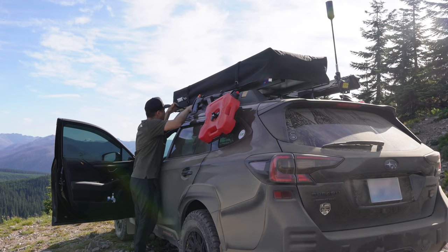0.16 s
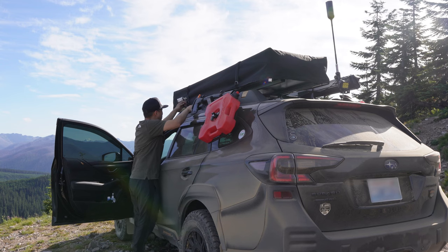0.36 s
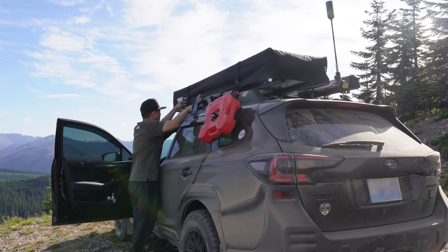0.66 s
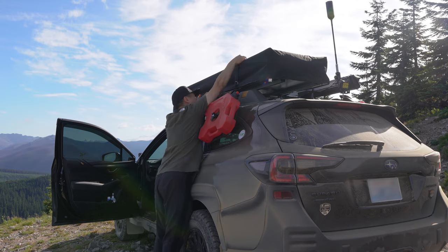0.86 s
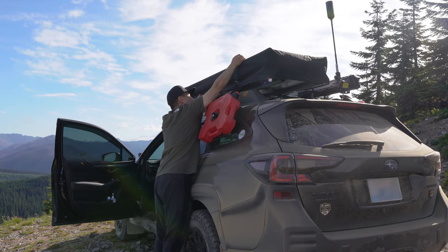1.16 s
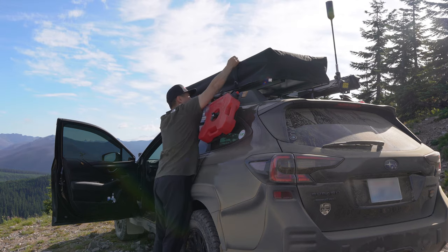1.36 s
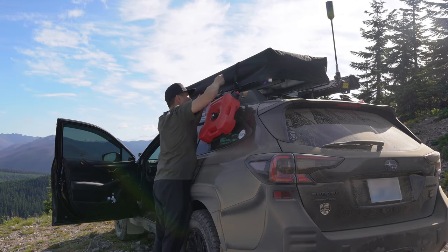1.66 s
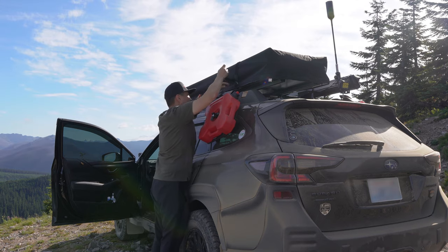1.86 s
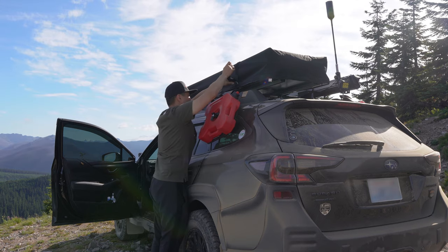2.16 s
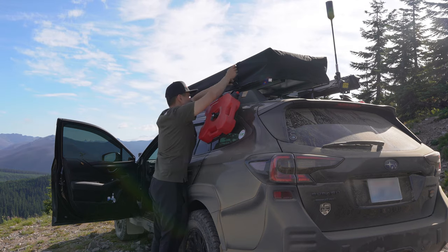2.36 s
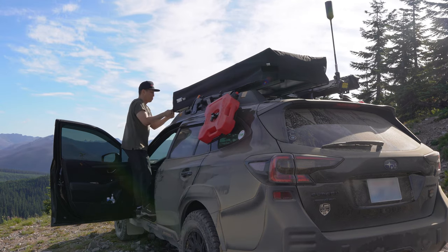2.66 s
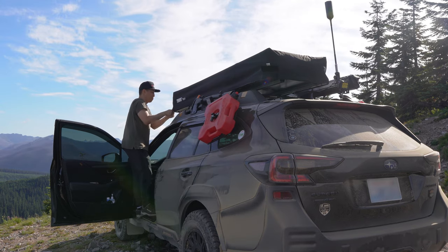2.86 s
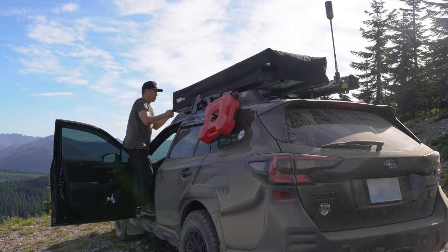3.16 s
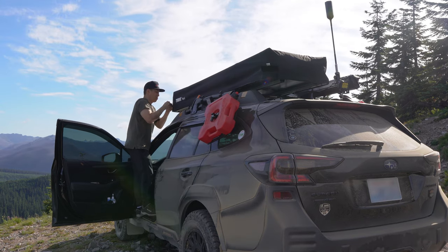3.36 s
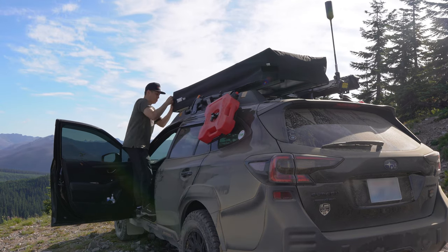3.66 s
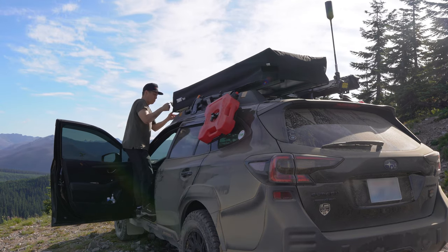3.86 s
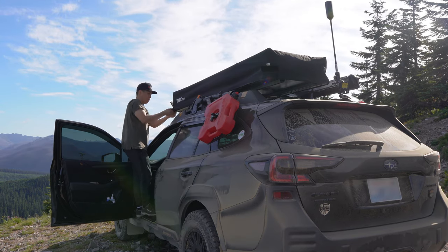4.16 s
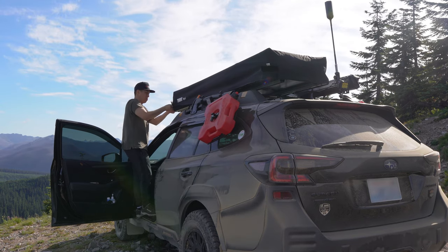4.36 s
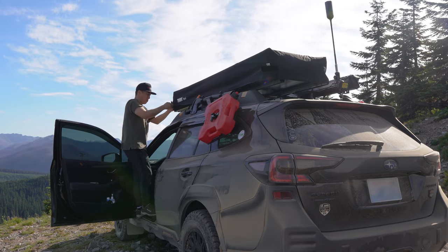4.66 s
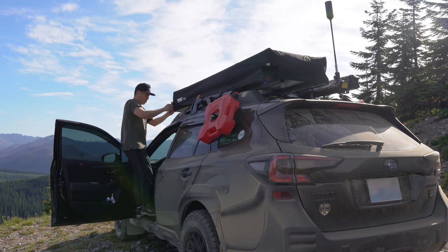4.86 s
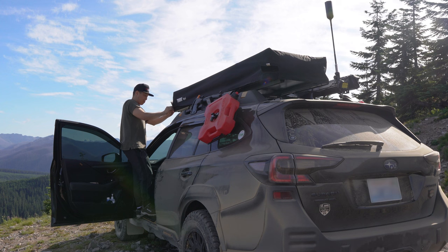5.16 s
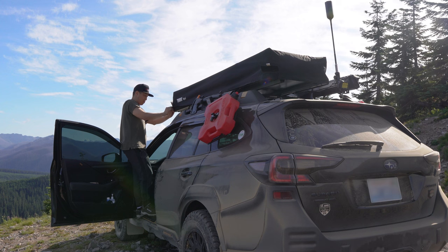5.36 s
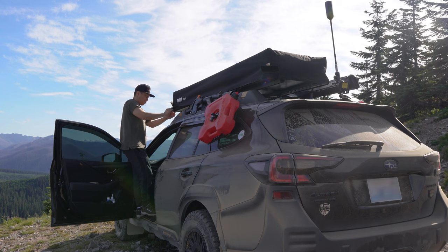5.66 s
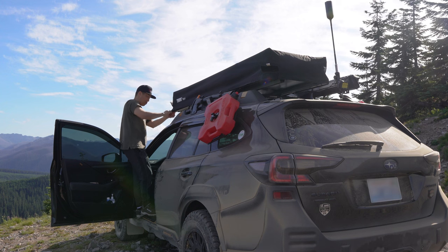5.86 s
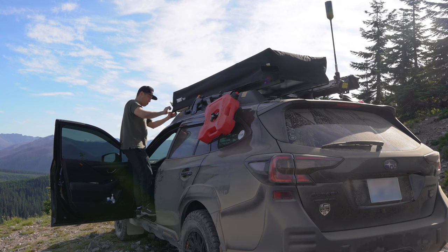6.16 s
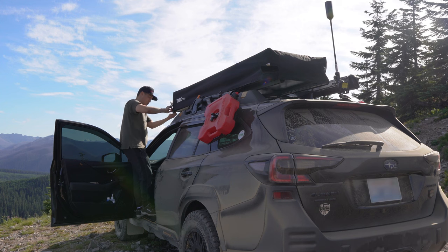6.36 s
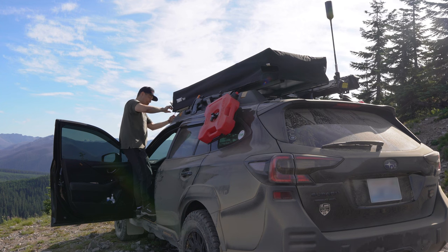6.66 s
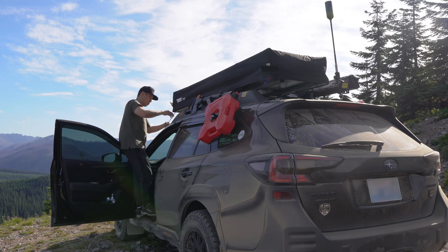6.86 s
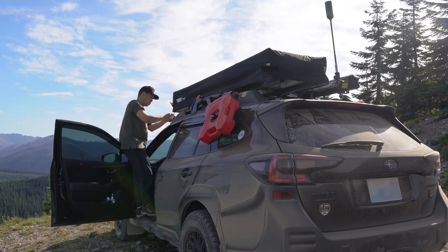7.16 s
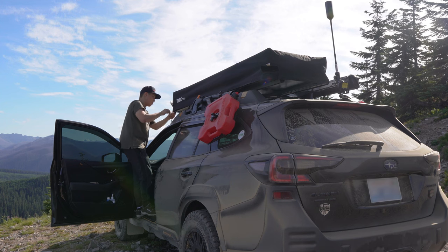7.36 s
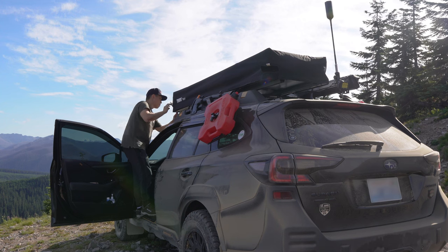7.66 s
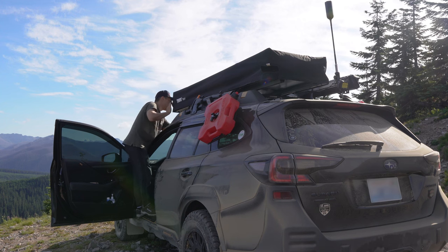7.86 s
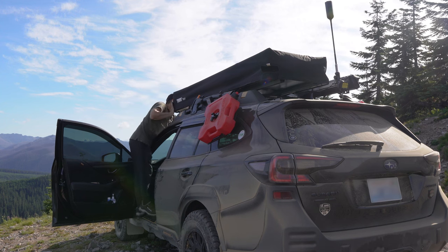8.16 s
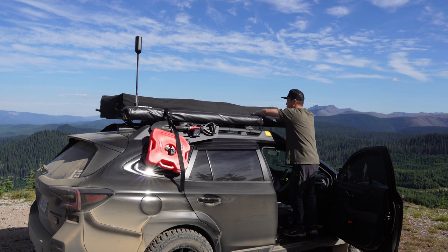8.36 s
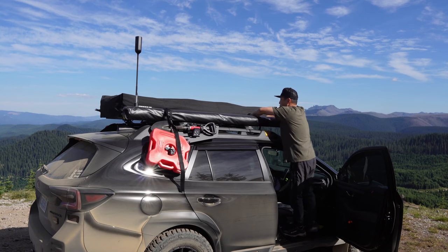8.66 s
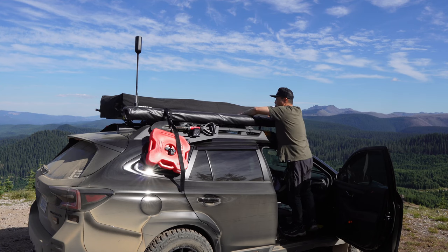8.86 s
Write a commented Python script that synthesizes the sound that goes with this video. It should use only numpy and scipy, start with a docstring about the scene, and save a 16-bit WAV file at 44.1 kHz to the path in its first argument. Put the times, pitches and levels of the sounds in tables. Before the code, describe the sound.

Someone undoes a roof tent cover outdoors. Three hook-and-loop straps peel apart with dry, bright tearing, the last the loudest. A cluster of buckle knocks follows, then sparser cloth scrapes and thin ticks, a quieter spell, and two rising and falling zipper buzzes. Close dry sound with short metal roof scatter, low wind thumps and faint hiss.

```python
"""Outdoors on a breezy ridge, a roof tent cover is undone beside a nearly mono two-channel microphone.
Three hook-and-loop straps rip as crowds of tiny noise slips; buckles and webbing tap as short ringing bursts.
Stiff fabric rustles in swelling bands of crackle, then a long zipper sings in two pulls of jerky partials.
The metal roof close by scatters these sounds; wind buffets the microphone as low noise over a faint hiss."""
import sys
import numpy as np
from scipy import signal
from scipy.fft import rfft, irfft
from scipy.io import wavfile
from scipy.ndimage import uniform_filter1d

SR = 44100
rng = np.random.default_rng(int(sys.argv[2]) if len(sys.argv) > 2 else 0)


def log_audio(samples):
    """Write samples as a 16-bit WAV file to the path given in sys.argv[1]."""
    # one column per channel
    frames = np.atleast_2d(samples).T
    # limit to full scale, then quantise
    limited = np.clip(frames, -1, 1)
    pcm = np.round(limited * 32767).astype(np.int16)
    wavfile.write(sys.argv[1], SR, pcm)


N = 396900  # samples, 9 s

# wind on the microphone, before gusts and wavering: (time [s], buffet level [dB], flutter level [dB])
WIND = [(0.1, -62, -54), (0.15, -63.5, -67), (0.82, -60, -61), (0.87, -45, -54), (1.06, -49, -57),
        (1.41, -28, -39), (1.61, -37, -44.5), (1.83, -34.5, -49), (2.15, -46, -58), (3.67, -43, -56),
        (4.02, -53.5, -61), (4.24, -49, -55), (4.39, -52, -59.5), (4.54, -44, -55), (5.01, -57, -65.5),
        (6.25, -67, -68), (6.57, -41, -64), (6.82, -56.5, -70.5), (7.24, -47, -57), (8.38, -45, -58.5),
        (8.53, -57.5, -65.5), (9.0, -47, -67)]
# brief gusts and lulls: (time [s], change of the buffet [dB], span to either side [s])
GUSTS = [(0.048, -5, 0.039), (0.865, 16, 0.015), (0.965, 10.5, 0.032), (1.427, 4, 0.21), (1.7, 10.5, 0.09),
         (1.849, 14.5, 0.025), (2.45, 7, 0.024), (2.57, 10, 0.023), (5.165, 5, 0.036), (6.58, -4, 0.04),
         (7.562, 4, 0.065), (8.054, 4, .05), (8.336, 6, 0.091)]
# spectrum of the faint hiss: (frequency [Hz], relative level [dB])
HISS_SPECTRUM = [(88, -5), (150, -4), (343, -2), (709, -8.5), (864, -11), (1030, -17), (2450, -17),
                 (4970, -20), (15000, -22.5), (16500, -27)]
HISS_DB = -65
SIDE_LOW_DB, SIDE_HISS_DB = -27.5, -75  # faint low noise and hiss, opposite in the two channels

# cloth resting in the hands: (dull rub level [dB], bright scrape level [dB], airy swish level [dB])
CLOTH_DB = (-69, -77, -89)
# strokes over the cloth: (time of the swell's top [s], rise [s], fall [s], rub level [dB], scrape level [dB])
STROKES = [(.1, 0.04, 0.17, -63.5, -65), (.45, .1, 0.14, -64, -73), (.92, 0.06, 0.046, -70, -66.5),
           (1.85, 0.31, 0.22, -65, -66.5), (2.5, 0.05, 0.22, -73, -64.5), (3.47, 0.018, 0.14, -58.5, -54),
           (3.66, 0.033, 0.14, -63, -55.5), (4.35, 0.25, 0.59, -71.5, -67.5),
           (4.69, 0.072, 0.052, -70, -53.5), (4.92, 0.2, 0.33, -78.5, -64), (5.4, 0.098, 0.067, -69, -69),
           (5.6, 0.088, 0.15, -73, -62.5), (5.74, 0.055, .1, -51, -61), (5.83, 0.06, 0.034, -62, -58),
           (5.96, 0.023, .04, -73, -58), (6.71, 0.068, 0.034, -84, -64.5), (6.46, 0.14, 0.043, -72, -62),
           (6.56, 0.032, .15, -69, -60.5), (6.9, 0.025, 0.048, -74, -63), (8.44, 0.043, 0.042, -60, -78),
           (8.889, 0.17, 0.14, -60, -49.5)]
# swish level at a scrape of SWISH_AT_DB, and its dB per dB of scrape
SWISH_DB, SWISH_SLOPE, SWISH_AT_DB = -68.5, 0.79, -60
CREASE_DB = -3.5  # sparse crackle in the scrape

# buckles, webbing and hands tapping: (time [s], base level [dB],
# tick, knock, clack and sizzle against the base [dB], base ring-out [s])
TAPS = [(.169, -44, -27, 0, -16, -30, 0.008), (0.436, -50, -10, -12, -17, -29, .025),
        (.486, -43, -19, -4, -18, -33, .044), (.525, -46, -14, -22, -19, -21, .022),
        (0.855, -37, -19, -11, -18, -23, 0.01), (1.637, -42, -23, -18, -12, -30, .022),
        (1.842, -41, -22, -32, -1.5, -18, 0.008), (2.239, -46, -7, -7, -12, -16, 0.037),
        (2.459, -42.5, -27, -9.5, -19, -22, 0.013), (3.509, -27, -0.5, -2.5, -2.5, -11.5, 0.023),
        (3.548, -41.5, -27, 1.5, -19, -36, 0.027), (3.625, -34, -20, -12.5, -8.5, -40, .039),
        (3.674, -30.5, -13.5, -19, -18, -17.5, 0.082), (3.925, -47.5, -9, -9, -5.5, -12, 0.041),
        (4.188, -37.5, -17, -27, -20, -14, .039), (4.254, -45, -11, -10, -13, -25, 0.016),
        (4.317, -42.5, -29, -12, -7.5, -23, 0.016), (4.388, -40, -12, -10, -8, -13, 0.038),
        (4.408, -30.5, -11, -22, -10, -26, 0.021), (4.426, -22, -8.5, -8, -2, -15, 0.018),
        (4.53, -28.5, -6, -13.5, -7.5, -21, 0.03), (4.636, -31, -5, -13, -8.5, -15.5, 0.058),
        (4.694, -37.5, -25, -6, -10, -20, 0.052), (5.713, -31.5, -16, -21.5, -12.5, -25, 0.0053),
        (5.959, -30, -12, -25, -16, -21.5, .02), (6.433, -35.5, -6, -33, -9, -8.5, 0.024),
        (6.448, -36, -10, -25, -14, -14, 0.016), (6.586, -26, -8, -9.5, -13.5, -33, 0.0067),
        (7.295, -43.5, -12.5, -39, -9, -32, 0.028), (8.376, -54, -4, -9.5, -3, -19, 0.017),
        (8.398, -37.5, -16, -3.5, -5, -13, 0.04)]
# bands a tap rings in, one row each for knock, clack and sizzle: (centre [Hz], width [Hz])
TAP_BANDS = [(550, 1080), (1500, 1880), (10000, 4100)]
TAP_TICK_HZ = 3610
# single snaps of hooks as a strap is peeled: (time [s], base level [dB], pitch [Hz],
# low part against the base [dB], sizzle against the base [dB])
SNAPS = [(0.972, -35, 5660, -9, -17), (0.987, -33.5, 5270, -12, -23), (1.004, -42, 5160, -12, -18),
         (1.024, -35, 4970, -11, -21), (1.041, -33.5, 4720, -11, -26), (1.072, -33, 4160, -10, -13),
         (1.107, -32.5, 4200, -13, -10), (1.131, -29.5, 4780, -13, -12), (1.161, -31, 4060, -9, -15),
         (1.218, -47, 4540, -3, -13), (1.248, -36, 4200, -4, -18), (1.293, -38.5, 4440, -3.5, -10.5),
         (1.338, -45, 4930, -5, -6), (1.356, -36, 4700, -2, -4), (1.405, -32, 5570, -4, -6),
         (1.444, -30.5, 3360, -6, -5.5), (2.541, -40, 3380, -2, -10.5), (2.583, -42, 5500, -11, -7),
         (2.6, -38, 4390, -15, -9.5), (2.759, -41.5, 4400, -15, -4.5), (2.784, -40, 4920, -20, -11),
         (2.874, -32.5, 5030, -14.5, -11), (2.885, -32, 4970, -9, -16), (2.895, -25.5, 3950, -11, -15),
         (2.915, -24, 4830, -14, -21), (2.948, -42, 5180, -16, -22), (2.973, -30, 5050, -19, -22),
         (2.985, -30.5, 5040, -7, -12), (3.007, -22, 4800, -13, -18), (3.038, -22.5, 4850, -11.5, -17),
         (3.066, -24, 4330, -11, -21), (3.078, -36, 4400, -9, -14), (3.113, -28.5, 4200, -11, -17),
         (3.14, -32, 3970, -10, -12), (3.153, -30, 5000, -20, -17), (3.193, -33.5, 3900, -5.5, -6),
         (3.205, -40, 3600, -13, 3), (3.226, -52, 5550, -24, -8), (3.232, -26.5, 3360, -3.5, 0),
         (3.262, -41, 4240, -18, -6), (3.272, -27.5, 4100, -13, 0), (3.284, -39, 4850, -11, -10),
         (3.294, -24, 4870, -11, 0), (3.304, -29, 3750, -9, 4), (3.317, -13.5, 3677, -17, -6.5)]
# tick against the base [dB], knock against the low part [dB], base ring-out [s]
SNAP_TICK_DB, SNAP_KNOCK_DB, SNAP_RING_S = -4, -8, .018
# thin ticks of creasing cloth and webbing: (time [s], base level [dB], pitch [Hz], sizzle against the base [dB])
TICKS = [(0.4004, -57, 3870, -16), (0.6092, -52, 4300, -10), (0.6794, -52, 3210, -18),
         (1.5898, -36, 3590, -16), (2.5252, -42, 3450, -16), (4.1649, -46.5, 3610, -9),
         (4.278, -47, 3760, -14), (4.7373, -41.5, 3970, -22), (4.7504, -55, 3080, -16),
         (4.815, -43, 4930, -20), (5.0606, -37.5, 3100, -20), (5.133, -45.5, 3640, -21),
         (5.1963, -46.5, 3500, -19), (5.356, -47, 5210, -16), (5.7384, -46, 4070, -18),
         (5.7545, -43, 4030, -16), (5.7774, -38.5, 3570, -15), (5.8048, -34.5, 3730, -16),
         (5.8276, -37, 3700, -13), (5.8505, -37, 3720, -16), (6.0028, -41, 5290, -14),
         (6.61, -39, 4300, -17), (6.6236, -40, 3700, -18), (6.649, -41, 4800, -21),
         (6.6842, -44, 3550, -18), (6.7107, -38.5, 4350, -16), (6.7338, -38.5, 3190, -18.5),
         (6.8957, -49.5, 3640, -13.5), (7.7448, -46, 4480, -9)]
# tick, knock and clack against the base [dB]; base ring-out [s]
TICK_BANDS_DB, TICK_RING_S = (-8, -21.5, -17.5), 0.018
BOUNCE_S, BOUNCE_DB = .006, 0  # latest second contact, and the ceiling of its strength

# straps being ripped, one table each: (time [s], tearing level [dB], base shaking level of strap and cover [dB])
RIPS = [
    [(0, -25, -24.5), (.052, -30, -29.5), (.064, -47.5, -38), (.1, -80.5, -68)],
    [(.95, -76, -70), (.974, -57, -58), (1.086, -46, -45), (1.096, -58, -59), (1.162, -40, -39.5),
     (1.264, -46, -45.5), (1.308, -58.5, -58), (1.364, -43.5, -44), (1.424, -41, -41.5), (1.568, -24, -38),
     (1.582, -54.5, -46.5), (1.62, -61.5, -63)],
    [(2.86, -75, -92), (2.874, -55.5, -71), (3.06, -51, -69.5), (3.098, -60, -78), (3.122, -49, -68),
     (3.17, -62, -79), (3.24, -53, -73), (3.272, -43.5, -64), (3.324, -25.5, -51), (3.424, -16, -38),
     (3.444, -47.5, -61), (3.47, -56, -70)],
]
# spectrum of the tearing: (frequency [Hz], relative level [dB])
TEAR_SPECTRUM = [(1060, -69), (1800, -45), (2620, -0.5), (3660, 4.5), (5180, 3), (5610, -0.5), (7000, -8.5),
                 (9100, -12), (15400, -120)]
# bands of a shaking strap, one row each for boom, drum, body and sizzle: (centre [Hz], width [Hz])
STRAP_BANDS = [(240, 100), (480, 195), (1250, 1960), (9500, 9700)]
# colour of each strap: (boom, drum and body against shaking [dB], sizzle against tearing [dB])
STRAP_COLOUR = [(-1.5, -16, -10.5, -2.5), (-2.5, 0.5, -2.5, -7), (-5, -3, 14, -8.5)]

# zipper pulls, one table each: (time [s], base rate of teeth [Hz], base tone level [dB], base rattle level [dB])
ZIPS = [
    [(7.76, 403.6, -60, -69), (7.802, 406.6, -47, -57), (7.816, 498.7, -41, -58),
     (7.866, 469.7, -39, -56.5), (7.918, 704, -37, -55.5), (7.96, 957, -36.5, -56),
     (8.008, 678, -42.5, -58), (8.04, 639, -36.5, -59), (8.09, 699, -41.5, -58.5), (8.144, 574, -36, -59.5),
     (8.162, 685, -38.5, -56.5), (8.204, 419, -42.5, -63), (8.256, 334, -51.5, -57), (8.33, 293, -59, -68)],
    [(8.46, 500.3, -61, -60), (8.508, 545, -48.5, -54.5), (8.528, 714, -55, -56.5), (8.57, 893, -42.5, -54),
     (8.59, 913, -42, -51), (8.61, 1140, -33.5, -50), (8.65, 1163, -36.5, -55.5),
     (8.688, 995, -39.5, -50.5), (8.712, 693, -39.5, -52), (8.754, 359, -55, -52.5),
     (8.77, 339, -79, -58.5)],
]
# noise bands of the slider, one row each for rattle, rasp and whistle: (centre [Hz], width [Hz])
SLIDER = [(3880, 1600), (1360, 3560), (9300, 2200)]
# how the cover voices the lower partials, one table per pull: (frequency [Hz], level [dB])
ZIP_BODY = [
    [(300, 6.5), (480, -8), (650, 2.5), (950, -2), (1300, -10), (1900, -12.5), (2800, -14)],
    [(330, 8), (520, -4), (750, 1.5), (1100, 0), (1500, 4.5), (2200, 3), (3400, -15)],
]
PARTIAL_FALL_DB, RASP_DB = -2.5, 4
WHISTLE_DB, WHISTLE_DB_PER_OCTAVE = -6, 6  # whistle against the rattle at 700 teeth a second
SLOW_JITTER, SLOW_HZ = .09, 450  # added unevenness of slow teeth, and the rate that sets where it fades

ROOF_DB, ROOF_T60_S = -10, 0.033  # scatter from the car roof and rack
TOP_HZ = 16050  # upper limit of the sound
SILENT_DB = -120


def undb(db):
    """Turn dB into an amplitude factor."""
    return 10 ** (np.asarray(db) / 20)


def unit(x):
    """Scale to rms 1."""
    return x / np.sqrt(np.mean(x ** 2))


def band(x, hz, width):
    """Two-pole-pair band-pass, scaled to rms 1."""
    top = hz + width / 2
    edges = np.clip([hz ** 2 / top, top], 5, .49 * SR)
    return unit(signal.sosfilt(signal.butter(2, edges, "band", fs=SR, output="sos"), x))


def colour(x, points):
    """Weight a sound's spectrum by (frequency [Hz], level [dB]) points, rms 1."""
    hz, db = np.transpose(points)
    f = np.maximum(np.fft.rfftfreq(N, 1 / SR), 1)
    gain = undb(np.interp(np.log(f), np.log(hz), db))
    return unit(irfft(rfft(x) * gain, N))


def play(tables):
    """Join curve tables into one track per column; SILENT_DB fills the pauses between them."""
    t = np.arange(N) / SR
    s, *columns = np.transpose(sorted(row for rows in tables for row in rows))
    inside = sum((t > rows[0][0] - .02) & (t < rows[-1][0] + .02) for rows in tables) > 0
    return np.where(inside, [np.interp(t, s, c) for c in columns], SILENT_DB)


def walk(rate):
    """Random levels held 1 / rate s and smoothed twice; rms 1."""
    hold = int(SR / rate)
    held = np.repeat(rng.standard_normal(N // hold + 1), hold)
    return unit(uniform_filter1d(uniform_filter1d(held, hold), hold)[:N])


def crackle(rate_hz, spread_db, tail_s):
    """Random slips, uneven in size when spread_db is not 0, each a noise burst with a decaying tail."""
    when, size, noise = rng.random(N), rng.exponential(size=N), rng.standard_normal(N)
    slips = (when < rate_hz / SR) * undb(spread_db * np.minimum(size, 4))
    return noise * signal.lfilter([1], [1, -np.exp(-1 / (tail_s * SR))], slips)


def hiss(points):
    """Steady noise shaped by (frequency [Hz], level [dB]) points, rms 1."""
    return colour(rng.standard_normal(N), points)


def wind():
    """Slow pressure swings on the capsule, with brief gusts and lulls, and a lighter flutter above them."""
    t = np.arange(N) / SR
    buffet_db, flutter_db = play([WIND])
    gust_db = sum(db * np.exp(-2 * ((t - s) / span) ** 2) for s, db, span in GUSTS)
    buffet = band(rng.standard_normal(N), 22.5, 31.2) * undb(gust_db + 1.33 * walk(8))
    # the flutter follows the gusts only in part
    flutter = band(rng.standard_normal(N), 52.7, 193) * undb(0.36 * gust_db + 2.9 * walk(14))
    return undb(buffet_db) * buffet + undb(flutter_db) * flutter


def rustle():
    """Coated cloth slides with a soft hiss and creases in tiny ticks; each stroke swells and fades."""
    t = np.arange(N) / SR
    rub, scrape, swish = undb(CLOTH_DB)
    for s, rise, fall, rub_db, scrape_db in STROKES:
        swell = np.exp(-2 * ((t - s) / np.where(t < s, rise, fall)) ** 2)
        swish_db = SWISH_DB + SWISH_SLOPE * (scrape_db - SWISH_AT_DB)
        rub = rub + undb(rub_db) * swell
        scrape = scrape + undb(scrape_db) * swell
        swish = swish + undb(swish_db) * swell
    cloth = unit(crackle(rate_hz=1800, spread_db=3.5, tail_s=0.0015)) + 0.74 * rng.standard_normal(N)
    creases = cloth + undb(CREASE_DB) * unit(crackle(rate_hz=120, spread_db=3, tail_s=0.0014))
    dull = rub * undb(2.6 * walk(45)) * band(cloth, 900, 1300)
    bright = scrape * undb(0.65 * walk(42)) * band(creases, 3740, 4200)
    return dull + bright + swish * band(cloth, 7500, 9500)


def taps():
    """Each tap, snap or tick is a gritty burst with a second contact just after; its tick band dies first."""
    grit = crackle(rate_hz=1800, spread_db=0.0, tail_s=0.0005)
    rings = [band(grit, hz, width) for hz, width in TAP_BANDS]
    t = np.arange(int(.15 * SR)) / SR
    out = np.zeros(N + len(t))
    snaps = [(s, db, SNAP_TICK_DB, low + SNAP_KNOCK_DB, low, sizzle, SNAP_RING_S, hz)
             for s, db, hz, low, sizzle in SNAPS]
    ticks = [(s, db, *TICK_BANDS_DB, sizzle, TICK_RING_S, hz) for s, db, hz, sizzle in TICKS]
    rows = snaps + ticks + [(*row, TAP_TICK_HZ) for row in TAPS]
    for (s, db, *bands_db, t60, hz), (late, weak) in zip(rows, rng.random((len(rows), 2))):
        i, t60 = int(s * SR), np.clip(t60, .004, .1)
        after = np.maximum(t - (.3 + .7 * late) * BOUNCE_S, 0)  # time since the second contact
        pieces = [band(grit[i:i + len(t)], hz, 0.55 * hz)] + [ring[i:i + len(t)] for ring in rings]
        # ring-out factors of tick, knock, clack and sizzle
        for piece, rel_db, longer in zip(pieces, bands_db, (0.9, 1.8, 1.38, 2.24)):
            def contact(u):
                """Sharp onset, then a decay by 60 dB in the band's ring-out time."""
                return (1 - np.exp(-u / 0.00019)) * 1000 ** (-u / (t60 * longer))
            burst = (contact(t) + weak * undb(BOUNCE_DB) * contact(after)) * piece
            out[i:i + len(t)] += undb(db + rel_db + 7.0) * burst / np.abs(burst).max()
    return out[:N]


def straps():
    """Hooks let go of their loops, more of them the harder the pull; strap and cover shake along."""
    tables = []
    for rows, (boom, drum, body, sizzle) in zip(RIPS, STRAP_COLOUR):
        tables.append([(s, tear, shake + boom, shake + drum, shake + body, tear + sizzle)
                       for s, tear, shake in rows])
    tear_db, *bands_db = play(tables)
    rate_hz = 3500 * undb(0.29 * (tear_db + 13.0))
    hooks = crackle(rate_hz, spread_db=1.66, tail_s=0.00026)
    # dividing by the root of the rate keeps the power of dense and sparse slips alike
    hooks = hooks * undb(1.3 * walk(130)) / np.sqrt(rate_hz)
    shake = sum(undb(db) * band(hooks, hz, width) for db, (hz, width) in zip(bands_db, STRAP_BANDS))
    return undb(tear_db) * colour(hooks, TEAR_SPECTRUM) + shake


def zipper():
    """Teeth pass the slider in jerks: a stepping, broken tone with ragged overtones, and a puff at each tooth."""
    hz, tone_db, rattle_db = play(ZIPS)
    second = np.arange(N) / SR > ZIPS[0][-1][0] + .05  # true from the second pull on
    jerk = int(0.016 * SR)
    steps = uniform_filter1d(np.repeat(rng.standard_normal(N // jerk + 1), jerk)[:N], jerk // 4)
    # slow teeth catch unevenly and blur the tone
    ragged = SLOW_JITTER * np.clip(2 - hz / SLOW_HZ * 1.5, 0, 1)
    turns = np.cumsum(np.maximum(hz, 0) * (1 + .05 * steps + (.03 + ragged) * walk(500))) / SR
    # the tone falters at each change of speed
    falter = 1 - .85 * np.exp(-(np.arange(N) % jerk) / (.22 * jerk))

    def body(f):
        """Voicing by the cover in the current pull [dB]."""
        first_db, second_db = (np.interp(f, *np.transpose(points)) for points in ZIP_BODY)
        return np.where(second, second_db, first_db)

    partials_db = [tone_db + body((k + 1) * hz) + PARTIAL_FALL_DB * k for k in range(3)]
    # the upper partials follow the rattle, each weaker than the last
    partials_db += [rattle_db - 5.0 - 2.0 * k for k in range(4)]
    tone = np.zeros(N)
    for k, db in enumerate(partials_db):
        tone += np.sqrt(2) * undb(db + 2.64 * walk(140)) * np.sin(2 * np.pi * (k + 1) * turns)
    teeth = np.exp(-(turns % 1) / 1.3) * rng.standard_normal(N)
    moving = hz > 0
    rattle, rasp, whistle = (band(teeth * moving, f, w) * np.sqrt(np.mean(moving)) for f, w in SLIDER)
    whistle_db = WHISTLE_DB + WHISTLE_DB_PER_OCTAVE * np.log2(np.maximum(hz, 100) / 700)
    slider = undb(-12) * rattle + undb(RASP_DB) * rasp + undb(whistle_db) * whistle
    return uniform_filter1d(falter, size=40) * tone + undb(rattle_db + 2.2 * walk(60)) * slider


def roof(x):
    """The metal roof close by returns a short, dense scatter."""
    t = np.arange(int(.2 * SR)) / SR
    tail = rng.standard_normal(len(t)) * (t > .002) * 1000 ** (-t / ROOF_T60_S)
    return x + undb(ROOF_DB) * signal.fftconvolve(x, tail / np.sqrt(np.sum(tail ** 2)))[:N]


def scene():
    """Place the handling sounds by the roof, then add wind and hiss."""
    handling = roof(rustle() + taps() + straps() + zipper())
    mid = wind() + undb(HISS_DB) * hiss(HISS_SPECTRUM) + handling
    # a faint independent low noise and hiss make the channels differ slightly
    low_noise = wind()  # a fresh draw with the same rise and fall
    side_hiss = hiss([(100, 15), (1000, -8.5), (15000, -3.5)])
    side = undb(SIDE_LOW_DB) * low_noise + undb(SIDE_HISS_DB) * side_hiss
    return np.array([mid + side, mid - side])


def record(dry):
    """Gently round the loudest peaks, then cut everything above about 16 kHz."""
    rounded = .9 * np.tanh(dry / .9)
    return signal.sosfilt(signal.ellip(14, .2, 100, TOP_HZ, fs=SR, output="sos"), rounded)


dry = scene()
out = record(dry)
log_audio(out)
```